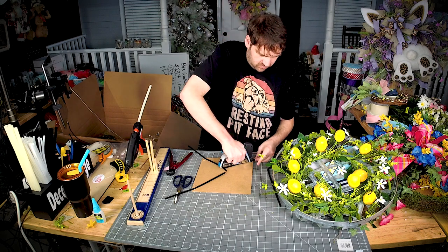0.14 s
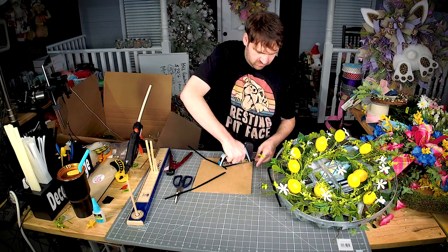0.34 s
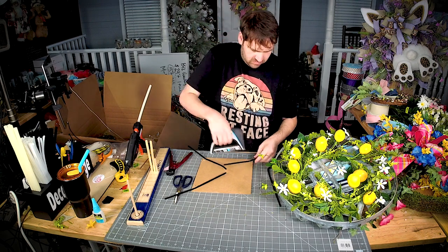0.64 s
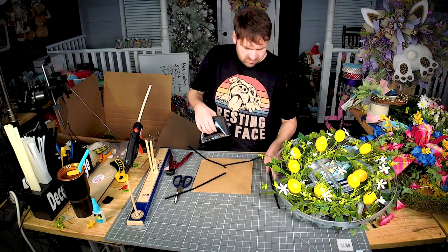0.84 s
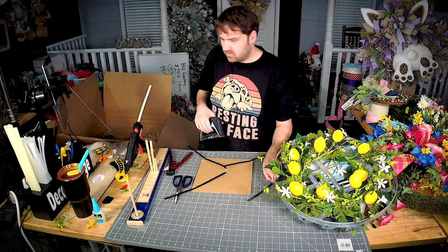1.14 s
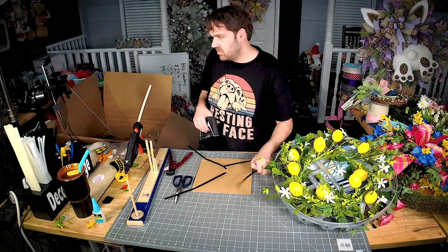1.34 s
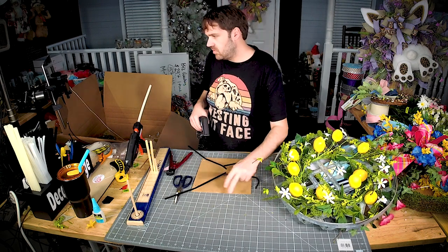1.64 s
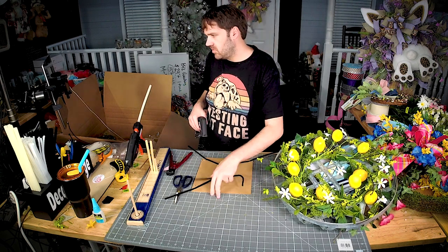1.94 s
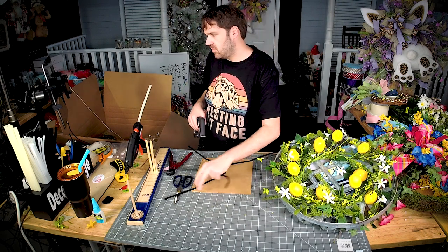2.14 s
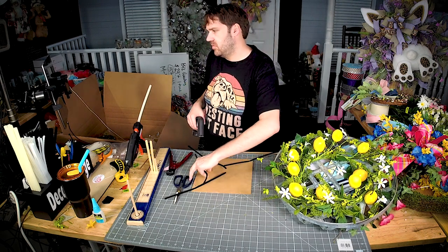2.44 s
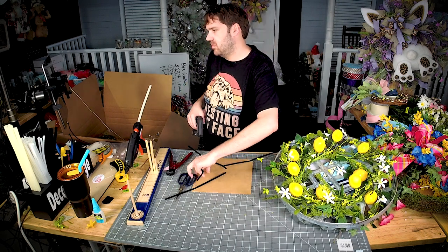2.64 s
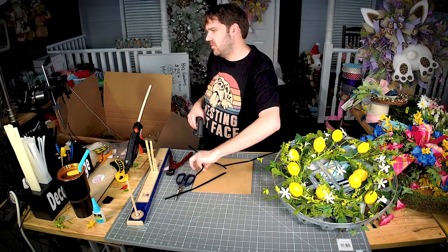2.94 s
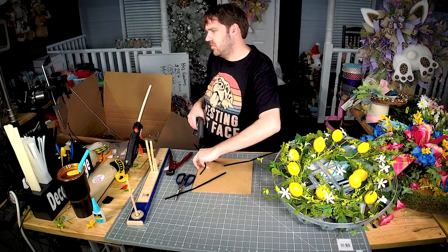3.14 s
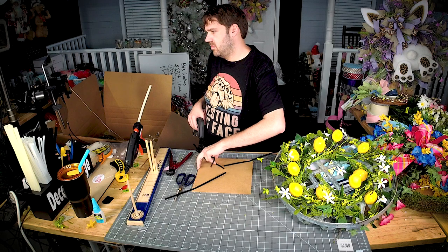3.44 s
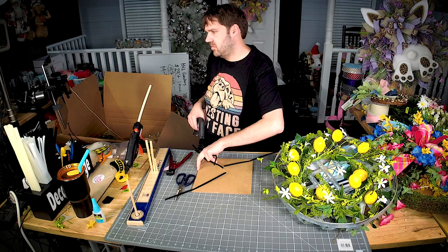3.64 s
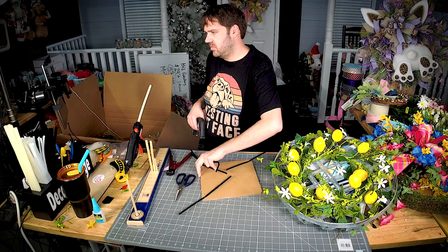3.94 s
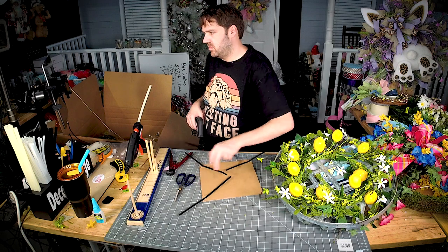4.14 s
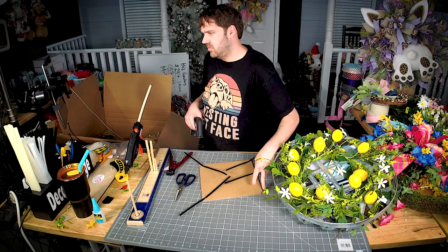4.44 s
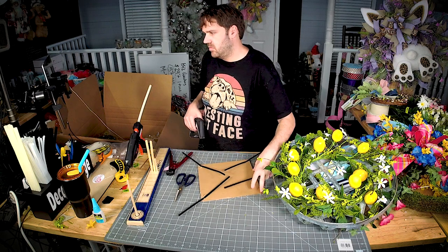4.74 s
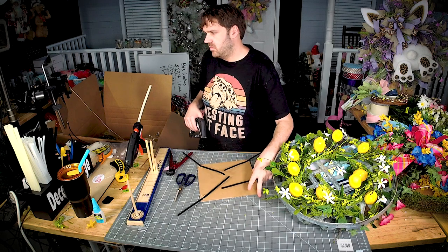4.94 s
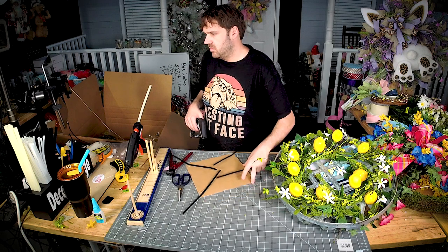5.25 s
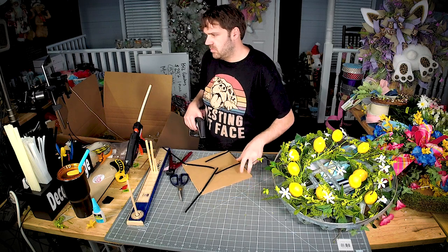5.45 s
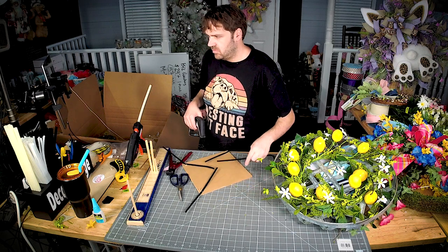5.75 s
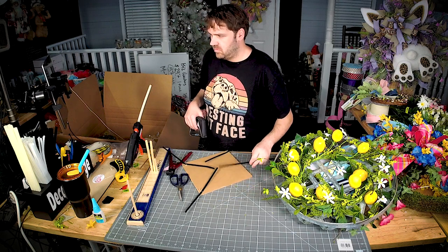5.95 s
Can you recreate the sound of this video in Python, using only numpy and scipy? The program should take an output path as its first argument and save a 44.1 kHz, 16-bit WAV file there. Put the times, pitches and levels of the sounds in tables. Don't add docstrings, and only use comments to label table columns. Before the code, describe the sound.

One hard staple shot cracks into card on a bench, air vents, the trigger clicks back, and quiet scrapes and knocks follow over fan rumble.

```python
import sys
import numpy as np
from scipy import signal
from scipy.fft import rfft, irfft
from scipy.io import wavfile

SR = 44100
rng = np.random.default_rng(int(sys.argv[2]) if len(sys.argv) > 2 else 0)


def amplitude_ratio(level_db):
    exponent = np.asarray(level_db, float) / 20
    return 10 ** exponent


def persist_wave(psi):
    counts = np.round(np.clip(psi, -1, 1) * 32767).astype(np.int16)
    wavfile.write(sys.argv[1], SR, np.atleast_2d(counts).T)


N = 269230


def rms_one(x):
    return x / np.sqrt(np.mean(x ** 2) + 1e-30)


def at_hz(points, hz):
    p = np.array(points)
    return np.interp(np.log(np.maximum(hz, 1)), np.log(p[:, 0]), p[:, 1])


def coloured(x, spectrum):
    hz = np.arange(len(x) // 2 + 1) * SR / len(x)
    inside = (hz > spectrum[0][0]) & (hz < spectrum[-1][0])
    return rms_one(irfft(rfft(x) * amplitude_ratio(at_hz(spectrum, hz)) * inside, len(x)))


def drift(rate_hz):
    r = np.exp(-2 * np.pi * rate_hz / SR)
    wander = signal.lfilter([1], [1, -2 * r, r * r], rng.standard_normal(N + SR))
    return rms_one(wander[SR:])


def resonance(x, hz, width_hz):
    r = np.exp(-np.pi * width_hz / SR)
    poles = [1, -2 * r * np.cos(2 * np.pi * hz / SR), r * r]
    return signal.lfilter([(1 - r * r) / 2, 0, (r * r - 1) / 2], poles, x)


def ring(clicks, modes):
    out = 0
    for row, (hz, db, t60) in zip(clicks, modes):
        r = amplitude_ratio(-60 / (t60 * SR))
        w = 2 * np.pi * hz / SR
        out = out + signal.lfilter([0, amplitude_ratio(db) * np.sin(w)], [1, -2 * r * np.cos(w), r * r], row + 1e-18)
    return out


# (frequency [Hz], density [dB per Hz])
FAN_SPECTRUM = [(18, -31.5), (30, -8.5), (49, -1), (71, -1), (102, 3.5), (123, -3), (144, -13.5),
                (173, -11), (238, -18), (322, -19), (436, -29.5), (465, -23), (524, -23), (567, -32),
                (700, -34), (910, -57), (1540, -120)]


def fan():
    level = amplitude_ratio(-51.5 + .8 * drift(1.2))
    return level * coloured(rng.standard_normal(N), FAN_SPECTRUM)


def bearing():
    turns_per_s, whisper_hz, level_db = 31.2, 10200, -88.0
    angle = 2 * np.pi * turns_per_s * np.arange(N) / SR + .5 * drift(4.0)
    whisper = resonance(rng.standard_normal(N), whisper_hz, 900)
    whisper = whisper * np.exp(3.0 * np.cos(angle)) * amplitude_ratio(2.5 * drift(8.0))
    return amplitude_ratio(level_db) * rms_one(whisper)


# (frequency [Hz], density [dB per Hz])
AIR_SPECTRUM = [(350, -31), (600, -1), (678, -3), (788, -4), (1060, -6.5), (1380, -9), (1620, -7),
                (4140, -15), (7740, -23), (10300, -16), (11500, -16.5), (12500, -24), (13300, -39.5),
                (14100, -36), (15500, -37.5)]


def air():
    return amplitude_ratio(-74 + 0.31 * drift(2.7)) * coloured(rng.standard_normal(N), AIR_SPECTRUM)


# (frequency [Hz], level [dB], t60 [s])
BENCH_MODES = [(221, -11.5, 0.02), (322, -9, 0.063), (356, -4.5, 0.029), (416, -4.5, 0.0989), (518, 1, 0.1),
               (660, 1, 0.064), (900, -14, .05), (1109, -5, 0.073), (1216, -1, 0.038), (1450, -8, .04),
               (1630, -7, 0.026)]
# (frequency [Hz], width [Hz], level [dB])
BRIGHT_BANDS = [(5900, 1800, 0), (8700, 1600, 1.5), (11263, 330, -3), (14100, 1800, -10)]


def contacts(events, width, bench_db, late_s, crack, reach):
    length = 4096
    t = np.arange(length) / SR
    out = np.zeros(N + length)
    chatter = rng.standard_normal((len(events), length))
    luck = rng.standard_normal((len(events), len(BENCH_MODES)))
    bench = np.zeros((len(BENCH_MODES), N))
    for (s, db, hz, top_db, thump_db, ms), noise, chance in zip(events, chatter, luck):
        i = round((s + late_s) * SR)
        noise = noise * np.exp(-t * 2300 / max(ms, .2)) * (1 - np.exp(-t / 0.0002))
        noise[6] -= crack / ms
        mid = resonance(resonance(noise, hz, hz * width), hz, hz * width * 1.4)
        soften = signal.butter(2, min(reach * hz, 9000), fs=SR, output="sos")
        mid = signal.sosfilt(soften, mid)
        bright = 0
        for k, (band_hz, width_hz, band_db) in enumerate(BRIGHT_BANDS):
            bright = bright + amplitude_ratio(band_db) * resonance(noise, band_hz, width_hz) * (-1) ** k
        hit = mid / np.abs(mid).max() + amplitude_ratio(top_db) * bright / np.abs(bright).max()
        out[i:i + length] += amplitude_ratio(db) * hit
        bench[:, i] = -amplitude_ratio(db + thump_db + bench_db + 2 * chance)
    cushion = signal.butter(2, 1700, fs=SR, output="sos")
    hits = out[:N] + signal.sosfilt(cushion, ring(bench, BENCH_MODES))
    small = signal.butter(5, 250, "high", fs=SR, output="sos")
    return signal.sosfilt(small, hits)


def lasting(rows, ms):
    return [(*row, ms) for row in rows]


# (time [s], peak level [dB], ring [Hz], thump into the bench [dB])
FINGER_TAPS = [(0.09, -61, 790, 8), (0.88, -56, 1010, -8.5), (1.139, -55, 986, -4), (1.436, -62, 1003, -11),
               (2.057, -58, 832, -12.0), (2.503, -50, 1040, -7), (2.515, -46, 1280, -3),
               (2.557, -52, 1010, -21), (2.619, -46.5, 1720, -12), (2.631, -47, 1516, -7),
               (2.649, -57, 1450, -17.5), (2.87, -50, 986, -15), (3.609, -68, 956, -5),
               (3.634, -65, 873, -17), (4.584, -67, 1277, -10), (6.004, -70, 815, -12.0)]


def taps():
    tick_db, contact_ms = -75, 5.1
    events = [(s, db, hz, tick_db - db, thump_db, contact_ms) for s, db, hz, thump_db in FINGER_TAPS]
    return contacts(events, width=0.69, bench_db=-10.0, late_s=.0005, crack=1.5, reach=2.3)


# (fastest moment [s], rise [s per 20 dB], fall [s per 20 dB], scrape level [dB], fine hiss level [dB])
CARD_STROKES = [(.098, .08, 0.2, -80.5, -79.5), (.882, 0.12, 0.1, -68, -77), (1.07, 0.15, 0.13, -60, -68),
                (1.25, 0.3, -0.3, -78, -75.5), (1.444, 0.33, 0.1, -81, -77), (2.03, 0.36, 0.4, -81, -83),
                (2.51, 0.15, 0.1, -60, -75.5), (2.559, 0.01, .03, -48, -59.5),
                (2.634, 0.0656, 0.0948, -58, -67.5), (2.76, 0.13, 0.08, -59, -73.5),
                (2.794, .01, .012, -48.5, -81), (2.843, 0.01, 0.0226, -49.5, -61),
                (2.87, 0.02, .08, -68, -72.5), (3.12, -0.2, 0.15, -80, -79.5),
                (3.61, 0.03, 0.03, -78, -74.5), (3.694, 0.1, -2, -78, -83), (3.82, 0.1, 0.17, -53.5, -63),
                (3.98, 0.1767, 0.08, -52, -63.5), (4.588, -0.01, .05, -72, -71),
                (4.73, 0.08, 0.23, -69, -74), (5.0, .08, 0.27, -65.5, -72),
                (5.10, 0.1073, 0.1836, -49, -61.5), (5.269, .14, 0.1246, -47.5, -57.5),
                (5.415, 0.1064, .03, -49.5, -62.5)]
HISS_FOLLOWS, THUD_FOLLOWS = .75, .55


def strokes():
    t = np.arange(0, N + 32, 32) / SR
    scrape, hiss = amplitude_ratio(2 * -84), amplitude_ratio(2 * -90)
    for s, rise, fall, scrape_db, hiss_db in CARD_STROKES:
        away = np.maximum((s - t) / max(rise, .002), (t - s) / max(fall, .002))
        loss_db = 20 * away ** 1.6
        scrape = scrape + amplitude_ratio(2 * (scrape_db - loss_db))
        hiss = hiss + amplitude_ratio(2 * (hiss_db - HISS_FOLLOWS * loss_db))
    return [np.interp(np.arange(N) / SR, t, np.sqrt(power)) for power in (scrape, hiss)]


# (time [s], half length [s], level [dB])
PALM_LEANS = [
    (.098, 0.033, -57.5),
    (2.52, 0.076, -59.5),
    (2.653, 0.044, -57.5),
    (2.787, 0.084, -59.5),
    (2.862, 0.046, -65),
    (3.513, 0.13, -67),
    (5.771, .12, -65),
]


def palm():
    t = np.arange(N) / SR
    return sum(amplitude_ratio(db - 20 * ((t - s) / half) ** 2) for s, half, db in PALM_LEANS)


# (frequency [Hz], width [Hz], level [dB])
CARD_BANDS = [(377.6, 19, -8.5), (655, 34, 16.5), (858.4, 12, 8), (1024, 220, 5), (1650, 83.8, -17)]
# (frequency [Hz], density [dB per Hz])
SCRAPE_SPECTRUM = [(130, -54), (220, -25), (414, 9), (475, -5.5), (660, -7), (798, 0), (1070, -2),
                   (1190, -2.5), (1660, 1), (2390, -7.5), (4500, -19), (5850, -56), (9900, -120)]
# (frequency [Hz], density [dB per Hz])
FINE_SPECTRUM = [(1650, -8), (2800, -3.5), (3560, -5), (4750, -12), (6720, -8.5), (7660, -11.5), (8410, -8),
                 (12700, -20.5), (14500, -21), (15800, -30)]


def rubbing():
    sizes = amplitude_ratio(2.3 * np.minimum(rng.exponential(1, N), 4)) * rng.choice([-1, 1], N)
    catches_per_s = 4500 * amplitude_ratio(2.2 * drift(40))
    grains = sizes * (rng.random(N) < catches_per_s / SR)
    card = grains + sum(amplitude_ratio(db) * resonance(grains, hz, width_hz) for hz, width_hz, db in CARD_BANDS)
    speed, light = strokes()
    scrape = speed * amplitude_ratio(-1.57 + 2.5 * drift(28)) * coloured(card, SCRAPE_SPECTRUM)
    fibres = coloured(rng.standard_normal(N) + 0.57 * grains, FINE_SPECTRUM)
    fine = light * amplitude_ratio(0.95 + 1.3 * drift(60)) * fibres
    thud = rms_one(resonance(resonance(rng.standard_normal(N), 240, 180), 250, 300))
    weight = speed ** THUD_FOLLOWS * amplitude_ratio(-36) + palm()
    return scrape + fine + weight * thud


# (time [s], peak level [dB], ring [Hz], top over 6 kHz [dB], thump into the bench [dB])
VALVE_TICKS = [
    (.2277, -17, 3001, 2, -19.5),
    (.2373, -17, 3250, -3, -18),
]
DRIVER_BLOW = [
    (.2455, -9.5, 1050, -24, -6),
    (.2465, -6.5, 1151, 0.5, -10),
    (.2485, -5.5, 3300, -3, -10.5),
    (.2514, -9, 1100, -4.0, -2.5),
    (.2523, -6, 3520, -6.0, -30),
]
DRIVER_REBOUND = [
    (.2565, -32, 1230, -4.0, -10.5),
    (.2625, -18, 783.7, -12.5, -5.5),
    (.2680, -20.5, 3950, -16, -4.5),
    (.2760, -24, 3700, -14.5, -16),
]
TRIGGER_RELEASE = [
    (.4893, -29, 3010, -16, -20.5),
    (.4940, -32.5, 3100, -8, -18),
    (.5040, -36.5, 2910, -5.5, -15),
    (.5116, -32.5, 1120, -6, -32),
    (.5125, -32, 2900, -4, -17),
    (.5165, -37.5, 2020, -25, -29),
]
LATCH_CLICKS = [
    (.5272, -28, 3020, 1.5, -18.5),
    (.5284, -23.5, 3020, 2.5, -30),
    (.5320, -39, 3300, -3, -28),
]


def gun():
    events = lasting(VALVE_TICKS, 3.2) + lasting(DRIVER_BLOW, 6) + lasting(DRIVER_REBOUND, 6.5)
    events = events + lasting(TRIGGER_RELEASE, 5.5) + lasting(LATCH_CLICKS, 1.5)
    return contacts(events, width=0.65, bench_db=-7.5, late_s=.0001, crack=1.6, reach=1.7)


# (time [s], level [dB])
VENT_FLOW = [
    (.227, -50),
    (.246, -24),
    (.256, -27),
    (.325, -38.5),
    (.41, -39),
    (.485, -46),
    (.53, -49),
    (.62, -60),
    (.80, -79.5),
]
# (frequency [Hz], density [dB per Hz])
JET_SPECTRUM = [(180, -28.5), (300, 2.5), (612, -14.5), (665, -11.5), (974, -16), (1170, -7), (1500, -13.5),
                (1660, -7), (1830, -9), (3670, 0.5), (5370, -6.5), (8550, -1.5), (12800, -17), (14500, -16),
                (15800, -22)]


def exhaust():
    flicker = amplitude_ratio(.7 * drift(25))
    flow_db = np.interp(np.arange(N) / SR, *np.transpose(VENT_FLOW), left=-200, right=-200)
    return amplitude_ratio(flow_db) * flicker * coloured(rng.standard_normal(N), JET_SPECTRUM)


# (frequency [Hz], level [dB], t60 [s])
STRUCK_MODES = [(860, -36.5, 0.066), (2000, -39.5, .055), (4740, -56, 0.035), (1800, -60.5, 0.0804),
                (1760, -58, 0.076), (3700, -54, 0.093), (112.5, -30.5, 0.26), (126.5, -34.5, 0.23),
                (1235, -16, 0.074), (1264.8, -15, 0.03), (655.8, -19, .07), (2800, -55, .09),
                (2700, -51, .06)]
STRUCK_AT = [5.3975, 5.3975, 2.0036, .978, 1.012, 1.064, .2530, .2530, .2466, .2516, .2516, 5.062, 1.061]


def struck_modes():
    clicks = np.zeros((len(STRUCK_MODES), N))
    clicks[np.arange(len(STRUCK_MODES)), (np.array(STRUCK_AT) * SR).astype(int)] = 1
    return ring(clicks, STRUCK_MODES)


# (time [s], peak level [dB], ring [Hz], top [dB], thump into the bench [dB])
SLEEVE_SCUFFS = [
    (1.052, -47, 2580, -26.0, -30),
    (1.064, -46.5, 2600, -24, -20),
    (1.085, -49, 2500, -22, -20),
    (2.5425, -34.5, 1200, -10, -11),
]
EDGE_SNAPS = [
    (1.405, -54, 2500, -12.0, -21),
    (2.4587, -42.5, 1800, -34, -14),
    (2.5408, -23.5, 2650, -14, -13.5),
    (2.7758, -31, 1280, -34.0, -24),
    (2.7762, -35, 2000, -34, -20),
    (2.7940, -43, 1500, -26, -15),
]
EDGE_KNOCKS = [
    (2.0034, -50, 1450, 1, -20.5),
    (2.8377, -29.5, 1700, -19, -13),
    (2.8390, -38, 2999, -22, -20),
    (5.043, -52, 2800, -12, -20),
    (5.110, -36.5, 2400, -22.0, -20),
    (5.381, -50, 2490, -12, -11),
    (5.3970, -30.5, 2500, -13, -2),
    (5.4125, -40, 1980, -26.0, -7),
    (5.4215, -45, 1400, -22.0, -20),
]


def card_edge():
    events = lasting(SLEEVE_SCUFFS, 18.5) + lasting(EDGE_SNAPS, 1.7) + lasting(EDGE_KNOCKS, 3.03)
    return contacts(sorted(events), width=1.1, bench_db=-23.0, late_s=-0.000072, crack=-14, reach=1.23)


# (frequency [Hz], width [Hz], level [dB])
SQUEAK_BANDS = [(1950, 96, -0.5), (4000, 260, -3.5)]


def squeak():
    middle_s, half_s, level_db = 5.76, .3, -83.5
    noise, t = rng.standard_normal(N), np.arange(N) / SR
    tones = 0
    for hz, width_hz, db in SQUEAK_BANDS:
        tones = tones + amplitude_ratio(db) * rms_one(resonance(resonance(noise, hz, width_hz), hz, width_hz))
    return amplitude_ratio(level_db - 12 * ((t - middle_s) / half_s) ** 4 + 2.8 * drift(9)) * tones


# (delay [s], level [dB])
EARLY_ECHOES = [
    (.0042, -12),
    (0.0165, -17),
    (.031, -22),
]
# (frequency [Hz], t60 [s])
TAIL_T60 = [(100, 0.54), (400, 0.37), (1500, 0.24), (5000, 0.1), (14000, 0.24)]


def room(x):
    t = np.arange(SR) / SR
    noise, tail = rng.standard_normal(SR), 0
    for low in 70 * 2. ** np.arange(8):
        octave = signal.butter(2, [low, 2 * low], "band", fs=SR, output="sos")
        tail = tail + signal.sosfilt(octave, noise) * amplitude_ratio(-60 * t / at_hz(TAIL_T60, 1.41 * low))
    response = amplitude_ratio(-12.0) * tail * np.clip(t / .006, 0, 1) / np.sqrt(np.sum(tail ** 2))
    for s, db in EARLY_ECHOES:
        smear = rng.standard_normal(200) * np.exp(-t[:200] / .0015)
        smear[0] = 6
        start = round(s * SR)
        response[start:start + 200] += amplitude_ratio(db) * smear / np.sqrt(np.sum(smear ** 2))
    return signal.fftconvolve(x, response)[:N]


def scene():
    background = fan() + bearing() + air()
    hits = taps() + gun() + struck_modes() + card_edge()
    return (background + rubbing() + hits + room(hits) + exhaust() + squeak())[None]


def low_pass(x):
    return signal.sosfilt(signal.butter(12, 15940, fs=SR, output="sos"), x)


def record(dry):
    peak_limit = .93
    clipped = np.clip(dry, -peak_limit, peak_limit)
    cut = signal.ellip(10, .5, 70, 15550, fs=SR, output="sos")
    mix = signal.sosfilt(cut, clipped)
    return low_pass(mix)


dry = scene()
out = record(dry)
persist_wave(out)
```